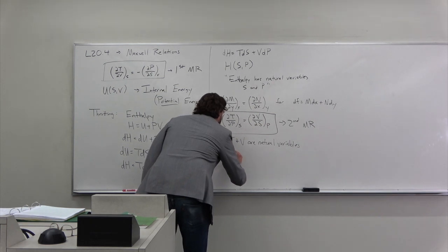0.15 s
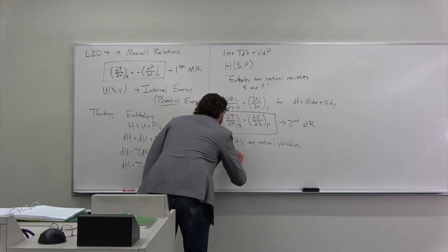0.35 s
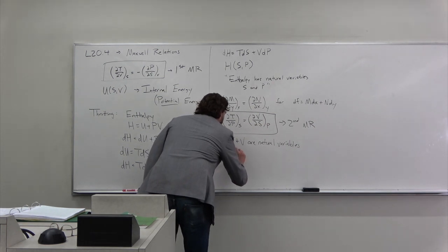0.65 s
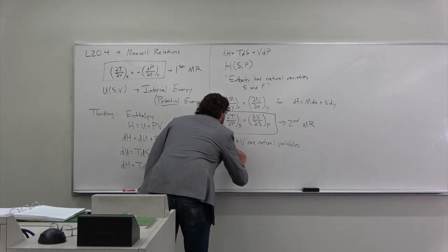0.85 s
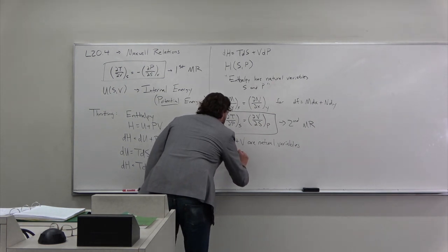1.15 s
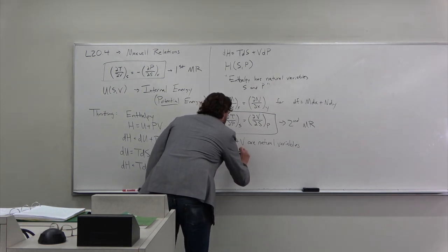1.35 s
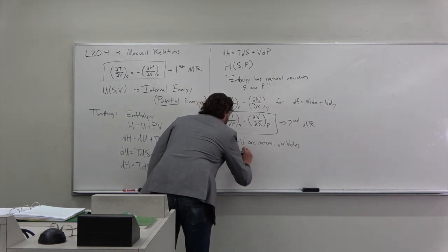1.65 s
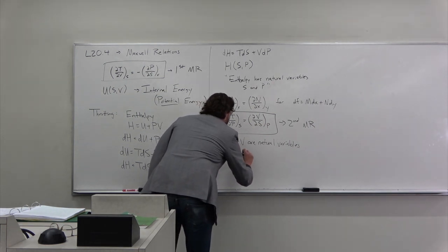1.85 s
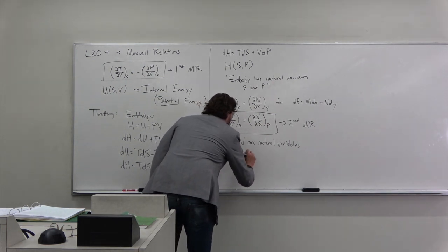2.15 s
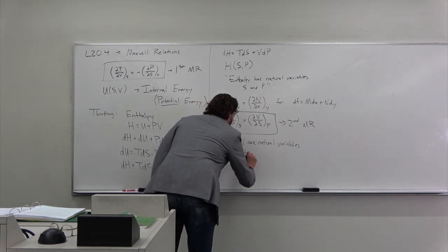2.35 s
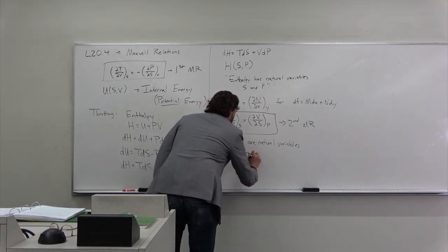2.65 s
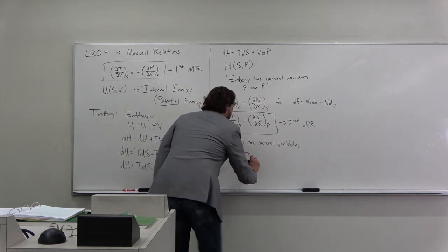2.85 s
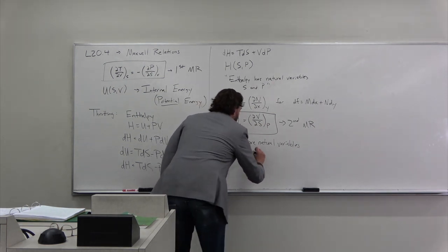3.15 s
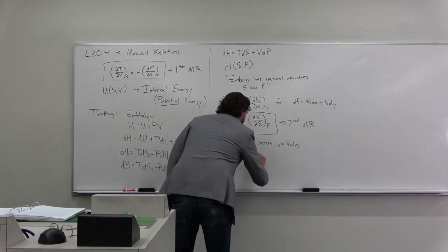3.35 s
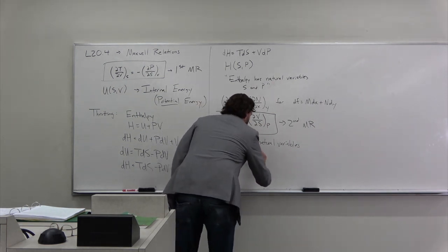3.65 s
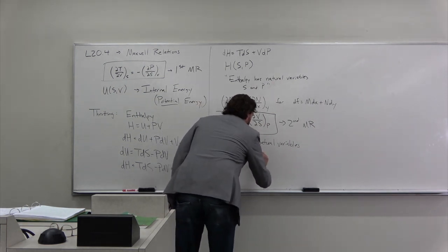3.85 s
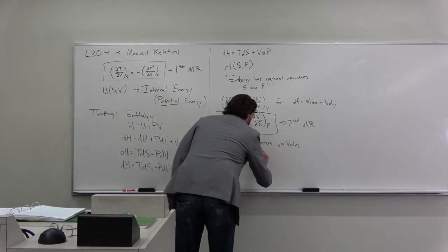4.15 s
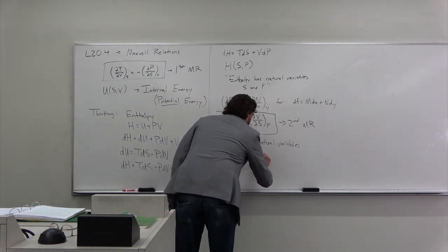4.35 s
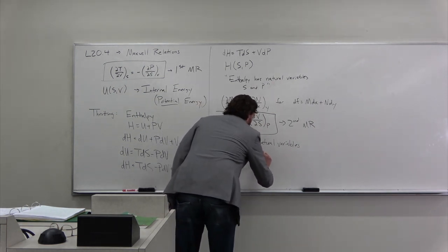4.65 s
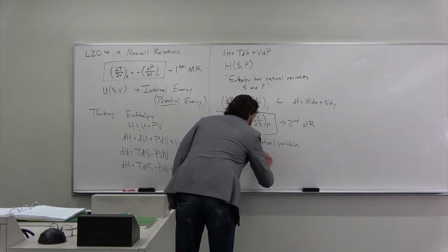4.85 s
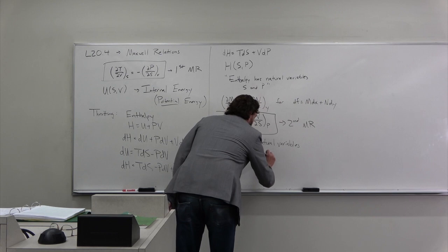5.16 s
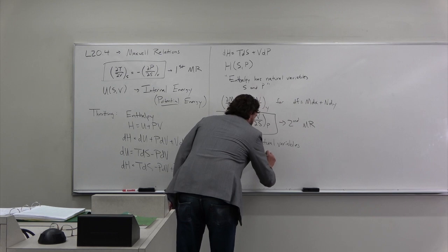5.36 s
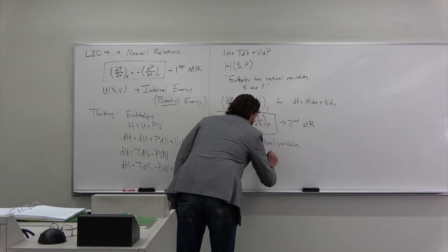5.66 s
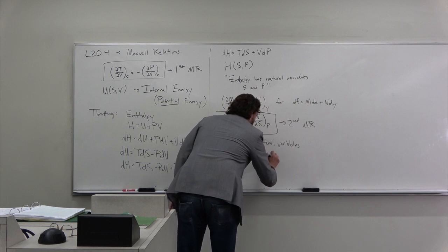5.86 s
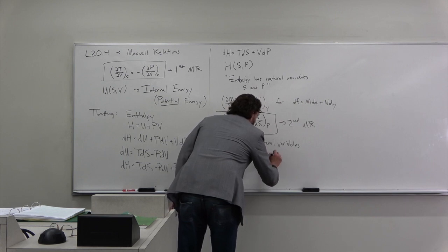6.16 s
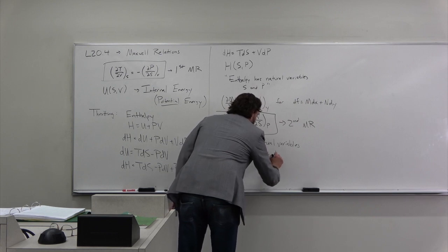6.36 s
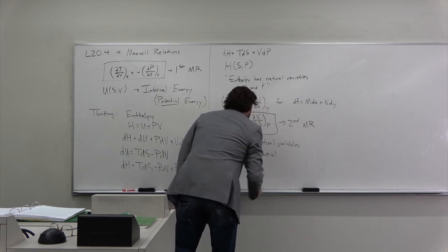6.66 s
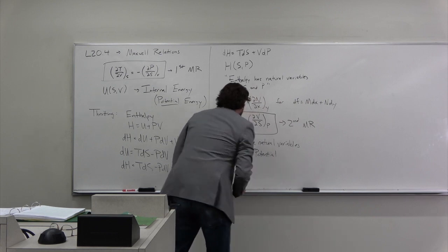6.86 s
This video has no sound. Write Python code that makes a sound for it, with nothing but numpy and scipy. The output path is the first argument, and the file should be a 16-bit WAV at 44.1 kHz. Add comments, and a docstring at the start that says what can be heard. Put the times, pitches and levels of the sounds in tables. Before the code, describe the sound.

A felt marker writes on a wall-mounted whiteboard in a quiet lecture room. Soft ventilation noise, a faint low mains hum and microphone hiss run throughout. From the start, the tip lands unevenly, making the panel give dull, hollow thuds with a short room tail, at about 0.2, 0.8, 1.5 and 1.7 seconds. From 1.9 seconds on, many landings also carry a sharp little click from the plastic barrel, clearest around 2.0 and 2.5 seconds. The felt gives a faint, very brief squeak at 2.8 seconds. Another tap comes at 3.3 seconds, then a quick cluster of softer ones around 3.6. From 4.3 to 6.3 seconds, lighter thuds with distinct clicks follow a few tenths of a second apart. The tapping then stops, and two faint squeaks at 6.5 and 6.9 seconds sound over the room's background noise.

```python
"""A felt marker writes on a wall-mounted whiteboard in a quiet lecture room.
Ventilation, mains hum and hiss run from the start. Until 6.3 s the tip lands unevenly: each landing
pushes the panel, which thuds in its bending modes, and the walls return a short tail. Many landings,
mostly from 1.9 s on, also click in the plastic barrel. The felt sticks and slips in faint squeaks at
2.8 s and, after the last click, at 6.5 and 6.9 s."""
import sys
import numpy as np
from scipy import signal
from scipy.fft import rfft, irfft
from scipy.io import wavfile
from scipy.ndimage import uniform_filter1d

SR = 44100
rng = np.random.default_rng(int(sys.argv[2]) if len(sys.argv) > 2 else 0)


def generate_wav(signal):
    """Clip the signal to [-1, 1] and save it as 16-bit WAV at the path in sys.argv[1]."""
    frames = np.transpose(np.atleast_2d(signal))
    scaled = np.clip(frames, -1, 1) * 32767
    pcm = np.round(scaled).astype(np.int16)
    wavfile.write(sys.argv[1], SR, pcm)


N = 309172
LEAD_S = 0.3  # tracks start this long before time zero


def panel_thuds(track):
    """The felt's soft push drives the panel modes and room tail; a longer contact sounds duller."""
    # Each row: start in seconds, blow in dB, contact in ms, scattered tail in dB re blow.
    blows = [(-.12, -0.5, 1.9, 4), (0.15, -8.5, 2.01, 2.5), (0.7686, -9.5, 1.58, 3.5),
             (1.0267, -43.5, 3.5, 2), (1.1404, -18.5, 2.47, -3), (1.4595, -5.5, 1.47, 5),
             (1.7251, -3, 1.17, 4.5), (1.7768, -23, 1.7, 7), (1.7963, -27, 4.7, -3), (1.922, -39, 4.9, 9),
             (1.9552, -6, 1.71, 6.5), (2.1583, -14, 0.71, 8.5), (2.167, -20.5, 1.8, 10),
             (2.5164, -7, 1.32, 3), (3.027, -36.5, 0.54, 8), (3.2551, -11.5, 1.75, 5.5),
             (3.5362, -23.5, 1.27, 14.5), (3.5453, -17.5, 2.66, -16), (3.5574, -24, 2.06, 8.5),
             (3.583, -30, 3.1, 14), (3.6023, -24, 3.8, -12), (3.665, -37.5, 4.3, 10),
             (3.691, -42.5, 3.9, 8), (3.943, -35, 5.1, 6), (4.2761, -19, 3.54, -4),
             (4.5138, -12.5, 2.19, 2.5), (4.8811, -18.5, 2.97, -2), (5.2462, -16, 2.22, -1),
             (5.4713, -9, 1.89, 7), (5.6233, -18, 2.48, -1.5), (5.77, -31, 6.2, 3),
             (5.8954, -19.5, 2.35, 0.5), (6.2836, -12, 1.8, 1.5)]
    # Each row: bending mode in Hz, level in dB, t60 in seconds, side of the node line at the tip (+-1).
    panel_modes = [(98, -53, 0.26, -1), (133.2, -17.5, 0.18, -1), (148, -18.5, 0.2, -1),
                   (172.5, -14, 0.15, -1), (197.3, -41, 0.62, -1), (215, -15, 0.02, 1),
                   (245, -18, 0.082, 1), (277.5, -34, 0.11, 1), (324.6, -18, 0.12, 1),
                   (344.9, -17.5, 0.13, 1), (397.4, -14, 0.026, 1), (449, -37.5, 0.067, 1),
                   (498.6, -12, 0.032, -1), (500.5, -5, 0.018, 1), (554, -42, 0.27, -1),
                   (591.5, -31.5, 0.1, 1), (633, -22, 0.036, 1), (653, -19, 0.017, -1),
                   (806, -14.5, 0.011, -1)]
    # Each row: delay of a far wall's echo in ms, level in dB.
    echoes = [(46, -34.5), (73, -34)]
    # Each row: frequency in Hz, level of the scattered tail in dB.
    tail_spectrum = [(40, -1), (80, 0), (120, 4.5), (200, 6), (350, -4), (550, -12), (900, -22.5),
                     (2000, -43.5)]
    size, pad = 27000, 128
    early_t60_s, late_t60_s = 0.19, 2.34
    rise_s, early_end_s, early_edge_s = 0.002, 0.084, 0.0035
    t = np.arange(size) / SR

    panel = sum(side * undb(db) * ring(hz, t60_s, size) for hz, db, t60_s, side in panel_modes)
    panel += undb(-36) * ring(hz=85, t60_s=0.1, size=size)  # board rocks on its brackets
    panel[0] += undb(2.5)  # direct sound of the dent under the tip
    panel += sum(undb(db) * np.roll(panel, int(ms * SR / 1000)) for ms, db in echoes)

    early = undb(-21.5 - 60 * t / early_t60_s) / (1 + np.exp((t - early_end_s) / early_edge_s))
    late = undb(-48 - 60 * t / late_t60_s) * np.cos(np.pi / 2 * (t * SR / size) ** 2)
    tail_envelope = (1 - np.exp(-t / rise_s)) * (early + late)

    felt_lowpass = signal.butter(4, 1024, fs=SR, output="sos")
    push_t = (np.arange(512) - pad) / SR
    for start_s, blow_db, contact_ms, tail_db in blows:
        force = signal.sosfiltfilt(felt_lowpass, pulse(push_t, contact_ms))
        tail = undb(tail_db) * tail_envelope * coloured_noise(tail_spectrum, size)
        # pressure follows the change of force
        thud = signal.fftconvolve(np.diff(force, prepend=0), panel + tail)
        add(track, start_s - pad / SR, undb(blow_db) * thud)


def barrel_clicks(track):
    """A brief rattle rings the barrel; the tip's slide and the walls keep it hissing in the same modes."""
    # Each row: start in seconds, main mode in dB, main and second mode in Hz (both shift with the grip),
    # then in dB re main: lowest mode, wall mode, second mode and neighbour, upper modes;
    # last, lean of the upper modes in dB, slide hiss in dB.
    clicks = [(0.152, -57, 3370, 4450, -2, 5, -9, -13, -2, -25),
              (1.726, -73, 3450, 4710, 19, 2, -10, 0, 0, -22),
              (1.8008, -44, 3420, 4620, -6, -10, -21, -19, 0, -20),
              (1.956, -23, 3420, 4310, -9, -10.5, -16, -15, 11, -24.5),
              (2.16, -34, 3580, 4700, -12.5, -2, -15.5, -8, -12, -10.5),
              (2.518, -23.5, 3490, 4820, -8.5, -3.5, -16.5, -13.5, -6, -24.5),
              (3.027, -68.5, 3350, 5060, 16, 0, -18, -6, 0, -16),
              (3.256, -26.5, 3340, 4840, -30, 1.5, -13, -14.5, 5, -26),
              (3.5379, -38, 3550, 4700, -20, -9, -16.5, -19, 9, -6.5),
              (3.9462, -59.5, 3250, 4610, -4, -1, -6, -16, 0, -25),
              (4.2788, -29.5, 3410, 4420, -23, -31, -29, -36, 0, -28),
              (4.5157, -28.5, 3330, 4880, -19, -17, -24, -26, -2, -26.5),
              (4.8837, -28, 3510, 4670, -12.5, -2, -18, -18, -2, -25.5),
              (5.248, -31, 3530, 4310, -7, 3, -10, -25.5, -1, -27),
              (5.473, -24, 3450, 4530, -41, -1.5, -10.5, -17.5, 2, -25),
              (5.6255, -27, 3550, 4600, -38, -4.5, -14, -22, 10, -24.5),
              (5.898, -26, 3590, 4480, -12.5, -5, -10.5, -24, 1, -25),
              (6.2855, -28.5, 3580, 4410, -34, 0, -13, -24.5, 9, -26.5),
              (6.3895, -55, 3530, 4510, -16, 1, -15, -16, 5, -15)]
    # Each row: frequency in Hz, t60 in seconds; for lowest mode, wall mode, second mode's neighbour.
    steady_modes = [(1933, 0.0059), (2693, 0.0062), (4030, 0.0088)]
    # Each row: frequency in Hz, t60 in seconds, dB within the group, signed share of the lean.
    upper_modes = [(6000, 0.0022, 2.5, 0.46), (7270, 0.0062, -5, -0.55), (8450, 0.004, -0.5, 0.87),
                   (9230, 0.0049, -8, 0.31)]
    even_hz, trade_db_per_khz, upper_drift = 4524, 24, 0.012
    slide_t60_s, slide_rise_s, treble_loss = 0.16, 0.00085, 0.17
    slide_damping = 0.63  # the pressed tip shortens each ring
    size = 6000
    t = np.arange(size) / SR
    rattle = pulse(t, length_ms=0.88)
    for start_s, main_db, main_hz, second_hz, *levels_db in clicks:
        lowest_db, wall_db, pair_db, upper_db, lean_db, slide_db = levels_db
        # a higher second mode takes more from its neighbour
        trade_db = trade_db_per_khz * (second_hz - even_hz) / 1000
        steady_db = (lowest_db, wall_db, pair_db - trade_db)
        modes = [(hz, t60_s, db) for (hz, t60_s), db in zip(steady_modes, steady_db)]
        for hz, t60_s, db, share in upper_modes:
            detune = 1 + upper_drift * rng.standard_normal()
            modes.append((hz * detune, t60_s, upper_db + db + share * lean_db))
        modes += [(main_hz, 0.006, 0), (second_hz, 0.0057, pair_db + trade_db)]
        for hz, t60_s, db in modes:
            jolts = rattle * (1 + 0.3 * rng.standard_normal(size))
            drive = jolts * np.sin(2 * np.pi * (hz * t + rng.random()))
            snap = signal.fftconvolve(drive, barrel_mode(hz, t60_s))[:size]
            friction = rng.standard_normal(size)
            hiss = signal.fftconvolve(friction, barrel_mode(hz, t60_s * slide_damping))[:size]
            decay = undb(-60 * t / slide_t60_s * (hz / main_hz) ** treble_loss)
            slide = undb(slide_db) * decay * (1 - np.exp(-t / slide_rise_s))
            click = snap / np.max(np.abs(snap)) + slide * hiss / np.std(hiss)
            add(track, start_s - 0.001, undb(main_db + db) * click)


def barrel_mode(hz, t60_s):
    """Tip and barrel wall resonate in series, so a mode builds up before it fades."""
    stage = ring(hz, t60_s, size=400)
    return np.convolve(stage, stage)


def tip_squeaks(track):
    """Stick-slip of the felt: a gliding tone with its octave, unsteady in level and pitch."""
    # Each row: start and length in seconds, first and last slip rate in Hz, peak in dB,
    # share of the length before the peak, roughness (0-1).
    squeaks = [(2.765, 0.025, 1080, 1310, -49, 0.51, 0.5), (2.779, 0.053, 1830, 1540, -54, 0.23, 0.42),
               (6.501, 0.089, 1270, 1153, -61.5, 0.58, 0.92), (6.943, 0.053, 715, 715, -57, 0.67, 0.43)]
    octave_db, edge_db = -14, -11.5
    for start_s, length_s, first_hz, last_hz, peak_db, rise, roughness in squeaks:
        size = int(length_s * SR)
        progress = np.arange(size) / (length_s * SR)
        wobble = uniform_filter1d(rng.standard_normal((2, SR // 5)), size=60, axis=1) * np.sqrt(60)
        jitter, shimmer = roughness * wobble[:, :size]
        slip_hz = (first_hz + (last_hz - first_hz) * progress) * (1 + 0.3 * jitter)
        phase = 2 * np.pi * np.cumsum(slip_hz) / SR
        tone = (np.sin(phase) + undb(octave_db) * np.sin(2 * phase)) * (1 + shimmer)
        level_db = peak_db + np.interp(progress, [0, rise, 1], [edge_db, 0, edge_db])
        envelope = undb(level_db) * signal.windows.tukey(size, 0.2)
        add(track, start_s, envelope * tone / np.std(tone))


def ventilation_and_hiss():
    """Ventilation noise and microphone hiss; the treble swells and flickers slightly."""
    # Each row: frequency in Hz, relative spectral density in dB.
    spectrum = [(15, -46), (25, -15), (87, -6), (114, -12), (141, -4.5), (223, 0), (285, -2.5), (405, -4.5),
                (624, -8.5), (1230, -15.5), (1650, -17.5), (1840, -19), (6380, -22.5), (16000, -29)]
    # Each row: time in seconds, treble gain in dB.
    swell = [(0, 3), (.58, 1), (1.089, 2), (1.33, 0), (2.13, 4.5), (3.14, -.5), (3.63, 1.9), (4.26, -1),
             (5.37, -0.5), (5.64, 0.8), (7.01, -1.5)]
    noise = undb(-59) * coloured_noise(spectrum, N)
    treble = signal.sosfiltfilt(signal.butter(2, [1500, 13000], "band", fs=SR, output="sos"), noise)
    treble_db = np.interp(np.arange(N) / SR, *np.transpose(swell)) + 0.3 * wander(rate_hz=8.5)
    return noise + treble * (undb(treble_db) - 1)


def mains_hum():
    """A low tone wavering in level and pitch."""
    rms_db = -71.5 + 3.1 * wander(rate_hz=4.5)
    hz = 117.4 + 1.496 * wander(rate_hz=3.3)
    return undb(rms_db) * np.sqrt(2) * np.sin(2 * np.pi * np.cumsum(hz) / SR)


def undb(db):
    """Decibels to gain."""
    return 10 ** (np.asarray(db) / 20)


def pulse(t, length_ms):
    """One sine-squared bump from t = 0."""
    return np.sin(np.pi * np.clip(t * 1000 / length_ms, 0, 1)) ** 2


def ring(hz, t60_s, size):
    """One decaying mode."""
    t = np.arange(size) / SR
    return undb(-60 * t / t60_s) * np.sin(2 * np.pi * hz * t)


def coloured_noise(spectrum, size):
    """Noise of rms 1 shaped by (Hz, dB) points."""
    hz, db = np.transpose(spectrum)
    bins_hz = np.fft.rfftfreq(size, 1 / SR)
    gain = undb(np.interp(np.log(bins_hz + 1), np.log(hz), db))
    noise = irfft(rfft(rng.standard_normal(size)) * gain, size)
    return noise / np.std(noise)


def wander(rate_hz):
    """Smooth random curve with spread near 1."""
    hold = int(SR / rate_hz)
    steps = np.repeat(rng.standard_normal(256)[:N // hold + 1], hold)
    return 1.3 * uniform_filter1d(uniform_filter1d(steps, hold), hold)[:N]


def add(track, start_s, sound):
    """Mix a sound into a track at scene time start_s."""
    i = round((start_s + LEAD_S) * SR)
    track[i:i + len(sound)] += sound[:len(track) - i]


def scene():
    """Board and marker over the room's background, mono."""
    lead = round(LEAD_S * SR)
    track = np.zeros(lead + N)
    panel_thuds(track)
    barrel_clicks(track)
    tip_squeaks(track)
    return (track[lead:] + ventilation_and_hiss() + mains_hum())[None]


def record(dry):
    """Steep low-pass at 15.8 kHz."""
    return signal.sosfilt(signal.ellip(10, 0.2, 70, 15800, fs=SR, output="sos"), dry)


dry = scene()
out = record(dry)
generate_wav(out)
```